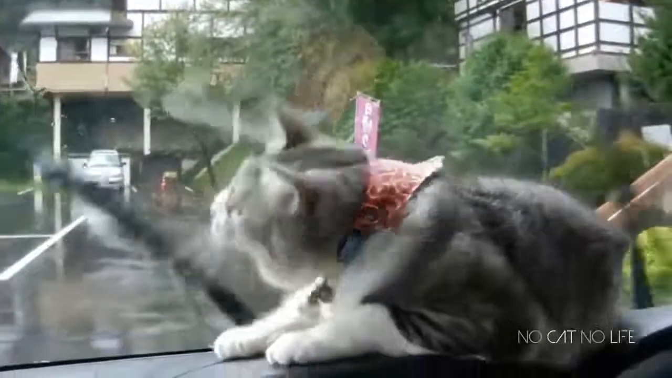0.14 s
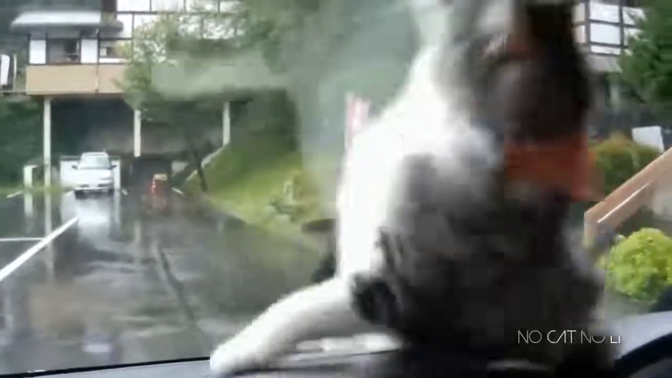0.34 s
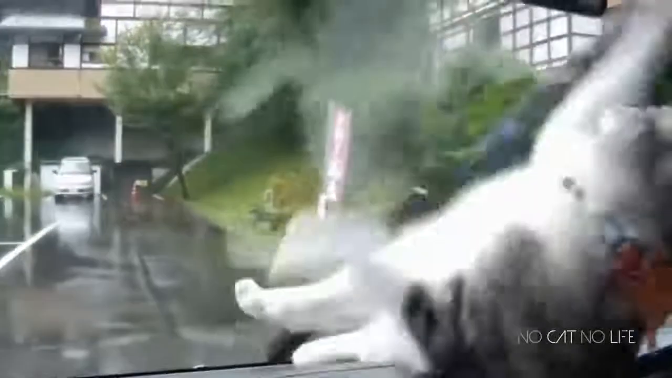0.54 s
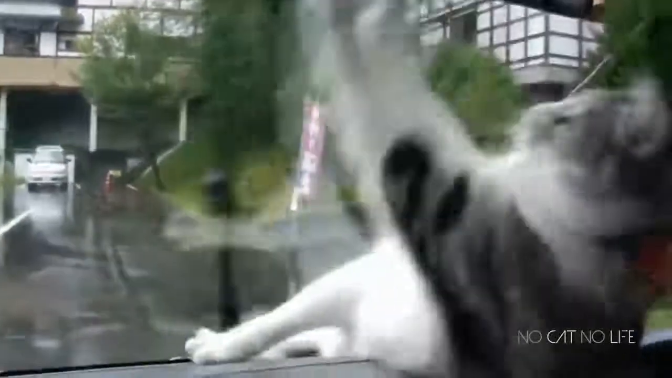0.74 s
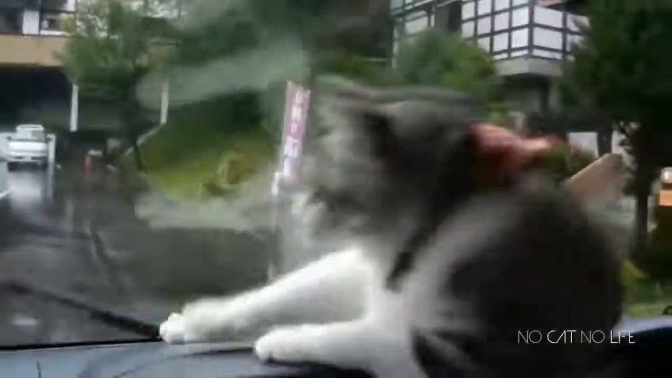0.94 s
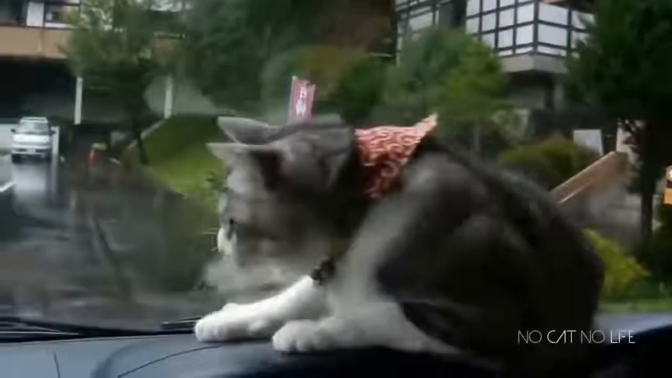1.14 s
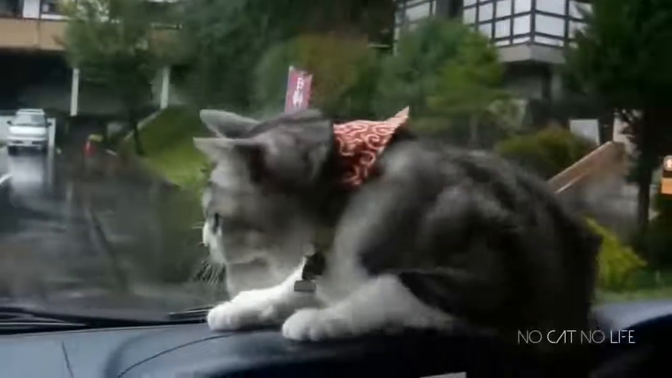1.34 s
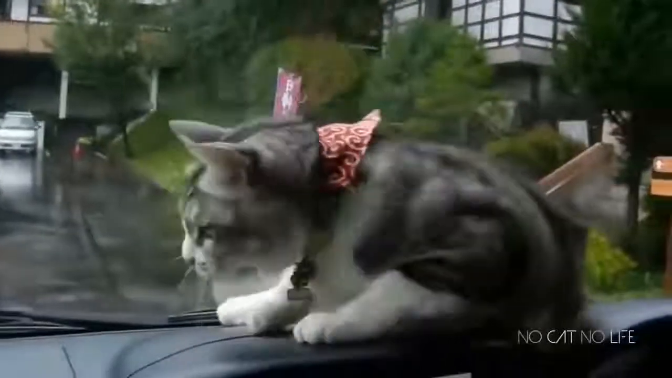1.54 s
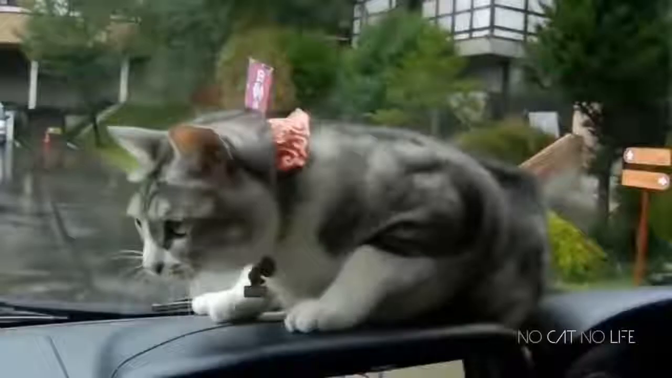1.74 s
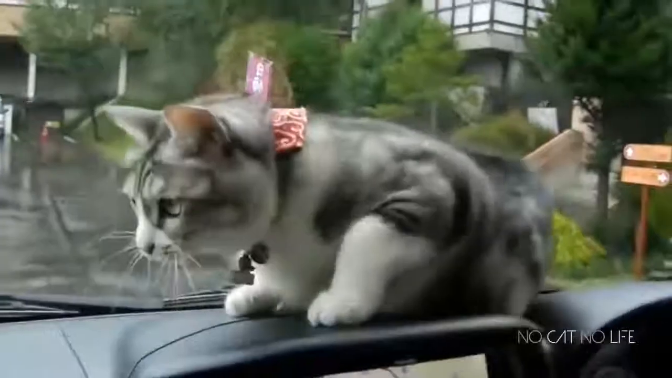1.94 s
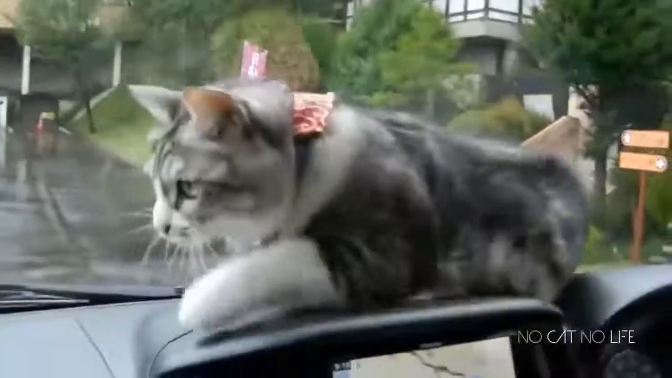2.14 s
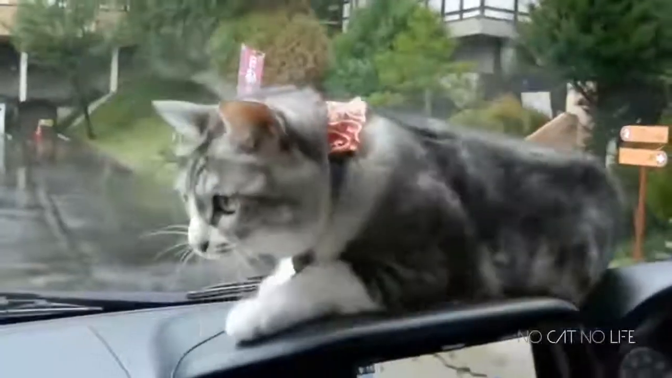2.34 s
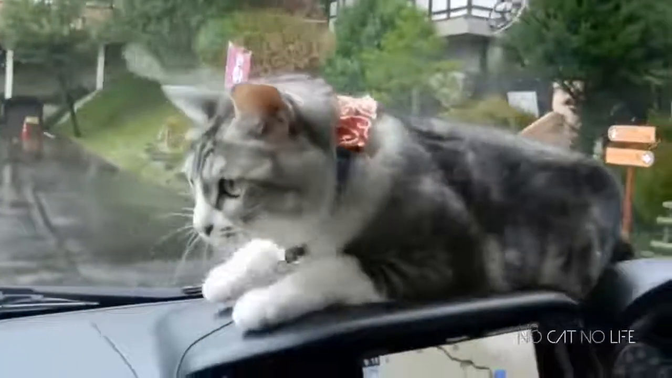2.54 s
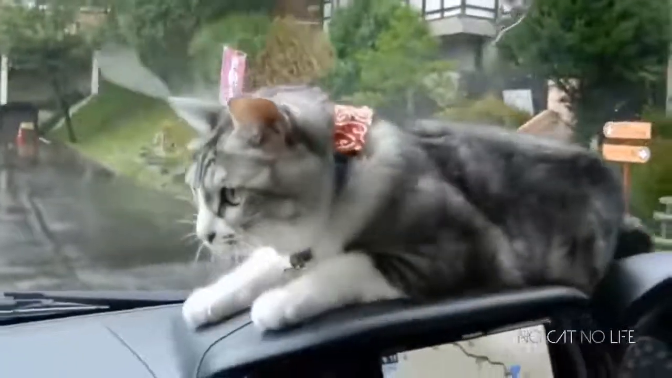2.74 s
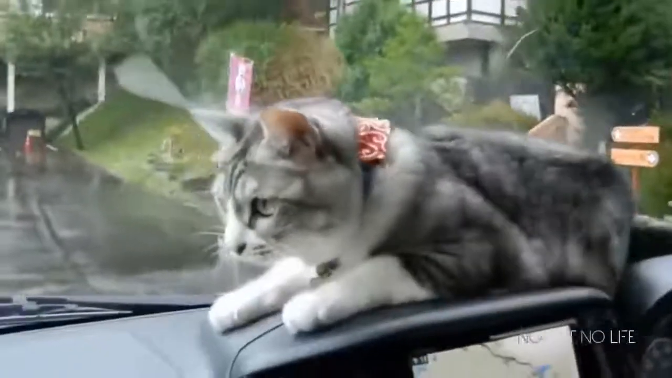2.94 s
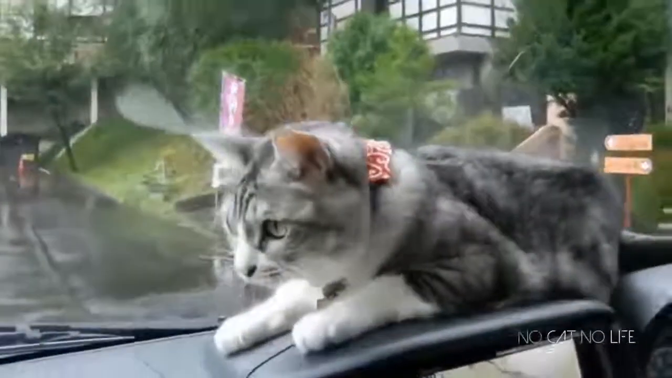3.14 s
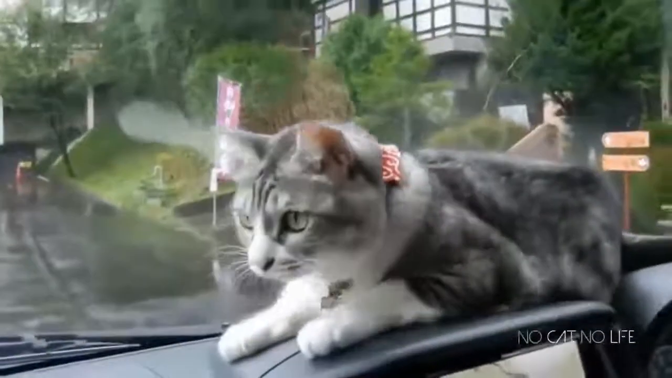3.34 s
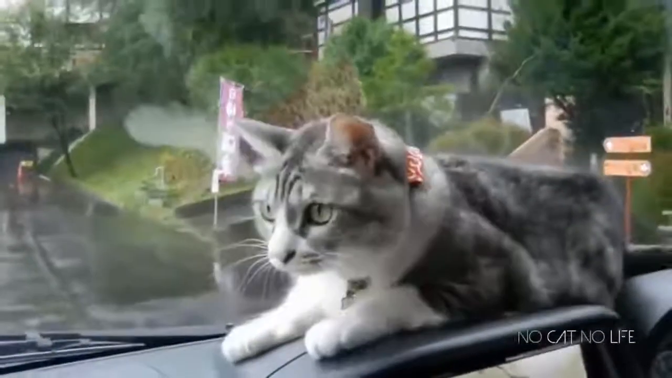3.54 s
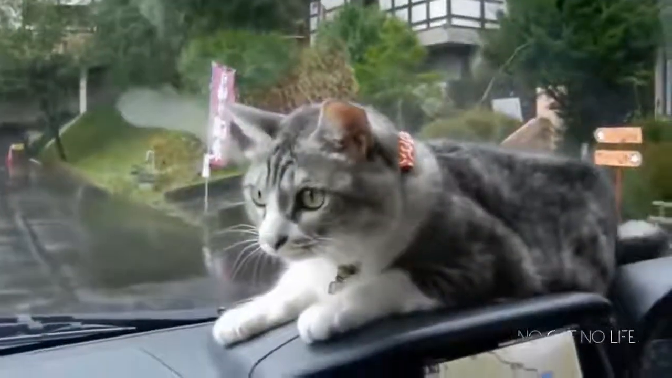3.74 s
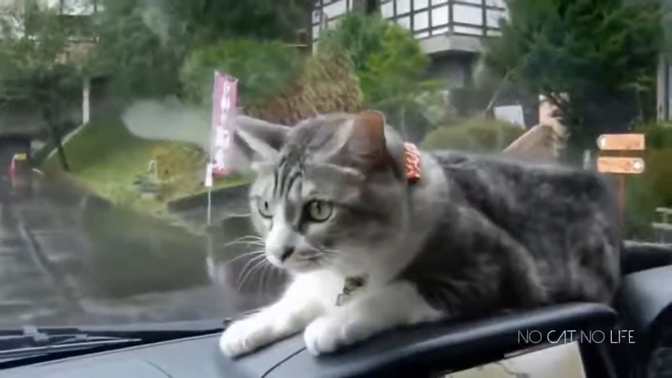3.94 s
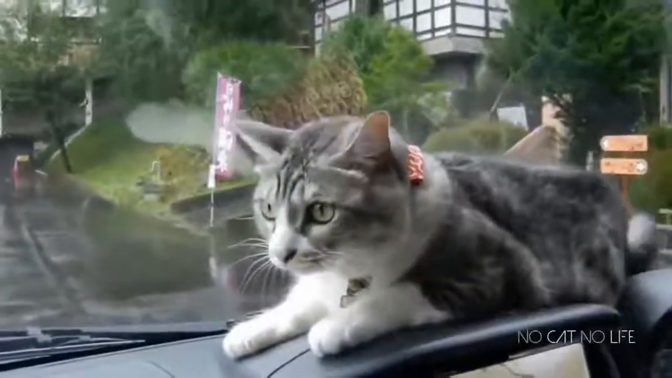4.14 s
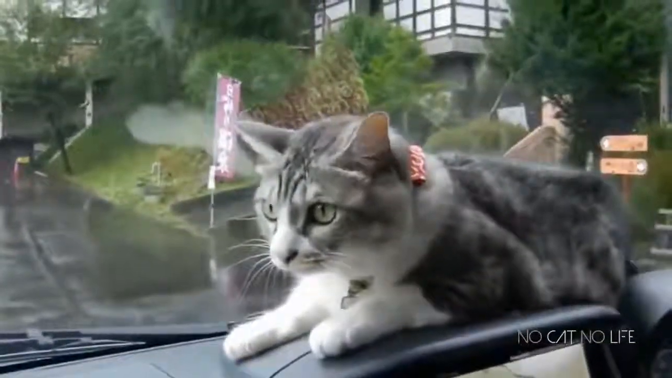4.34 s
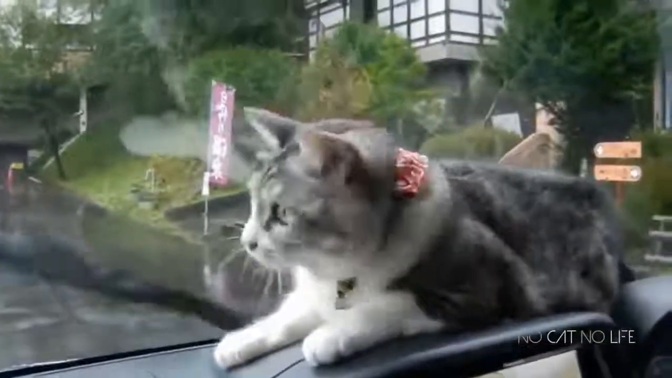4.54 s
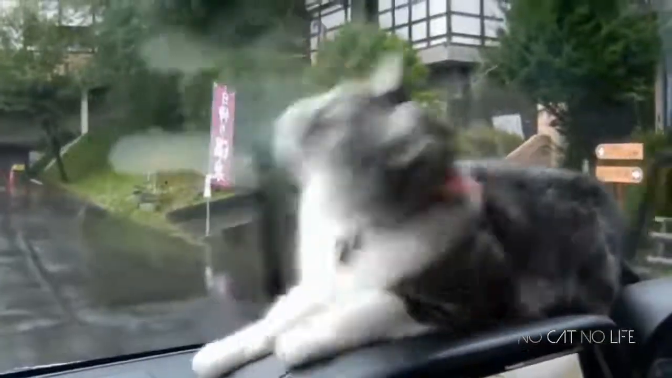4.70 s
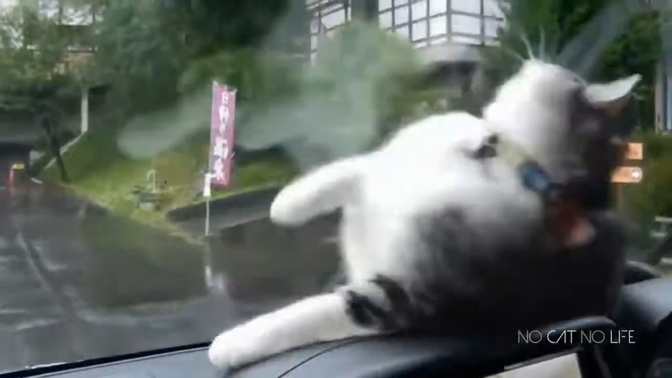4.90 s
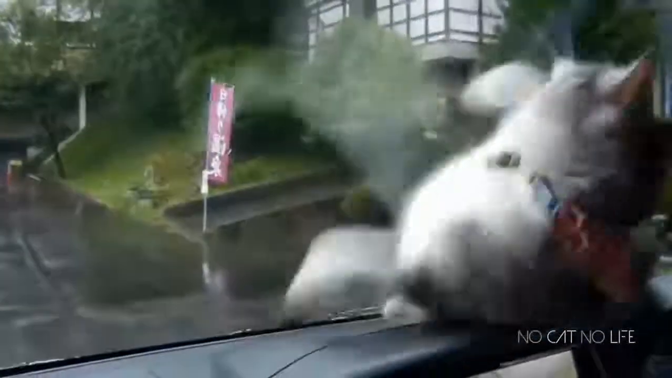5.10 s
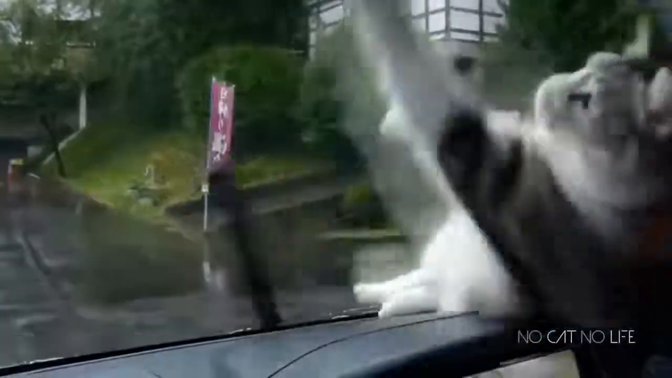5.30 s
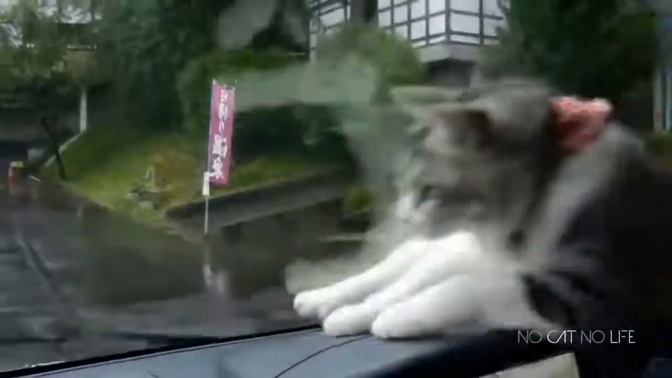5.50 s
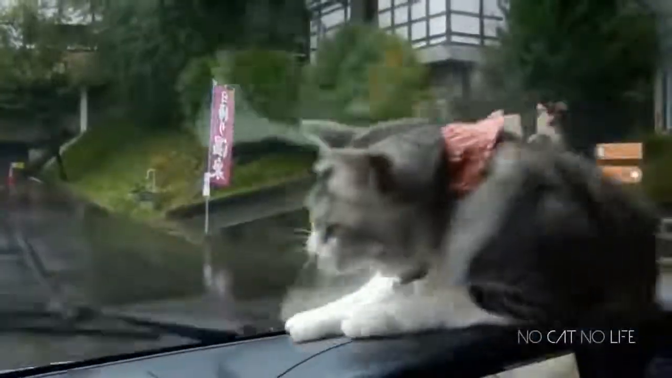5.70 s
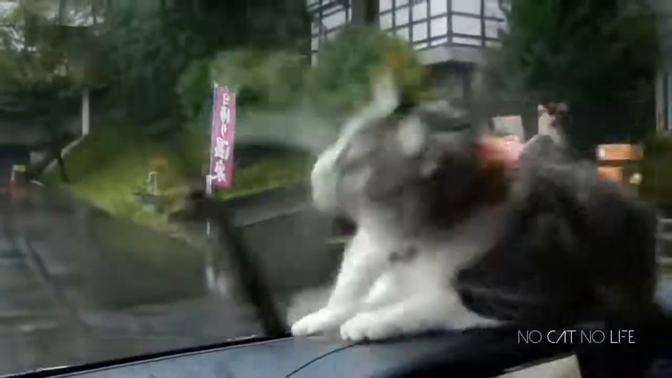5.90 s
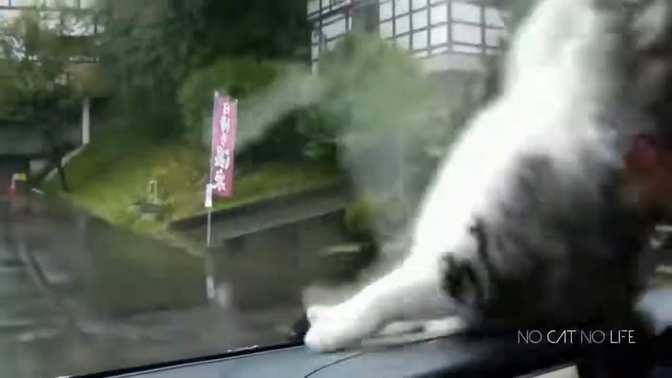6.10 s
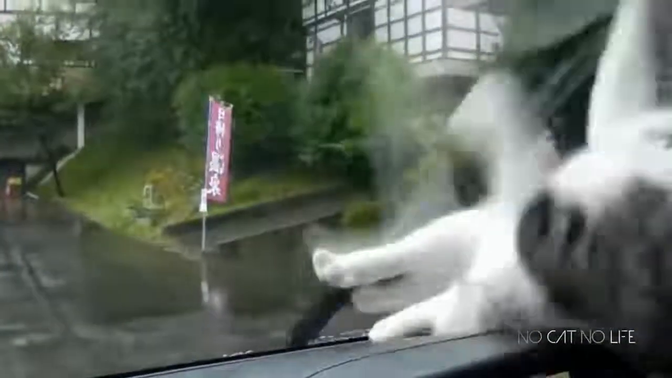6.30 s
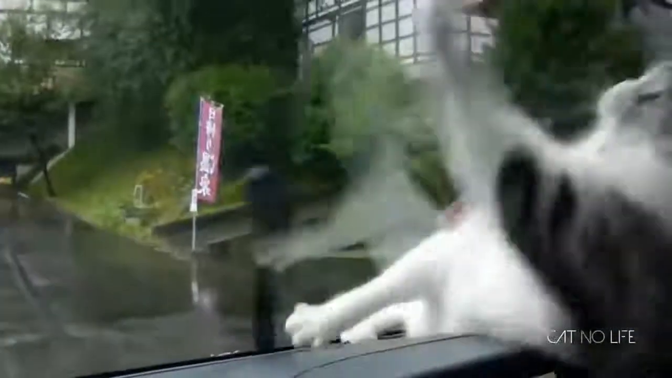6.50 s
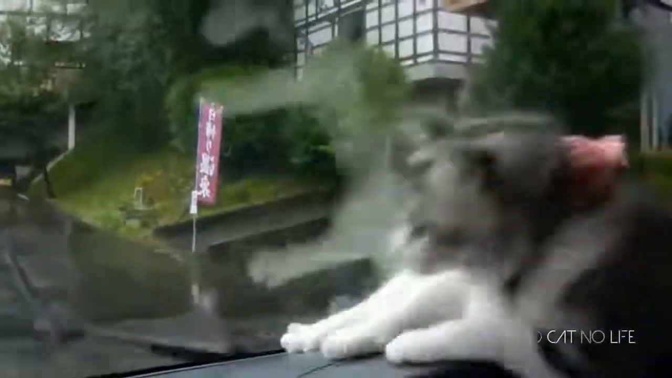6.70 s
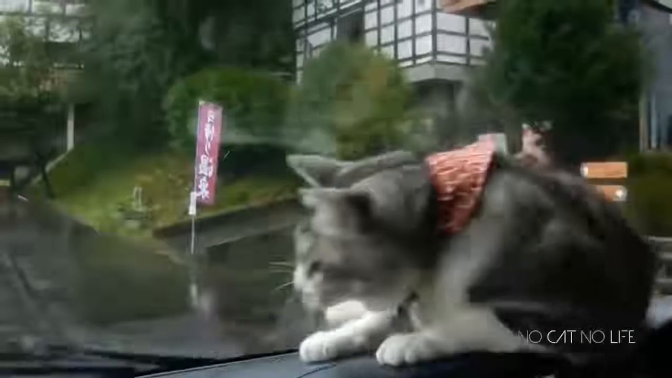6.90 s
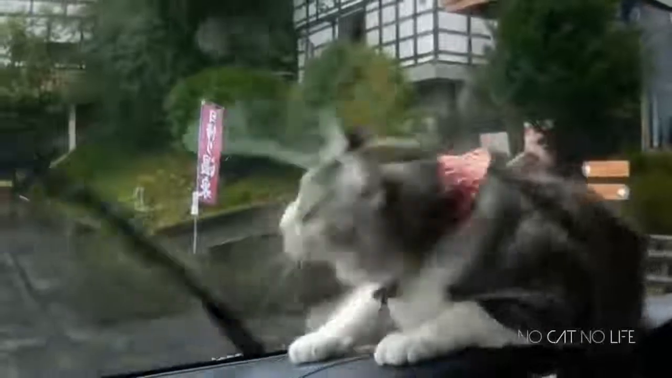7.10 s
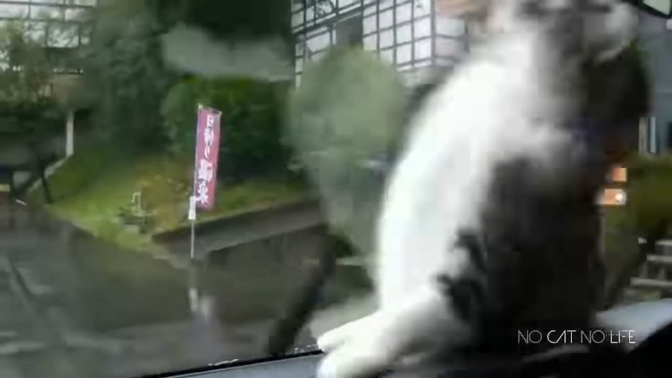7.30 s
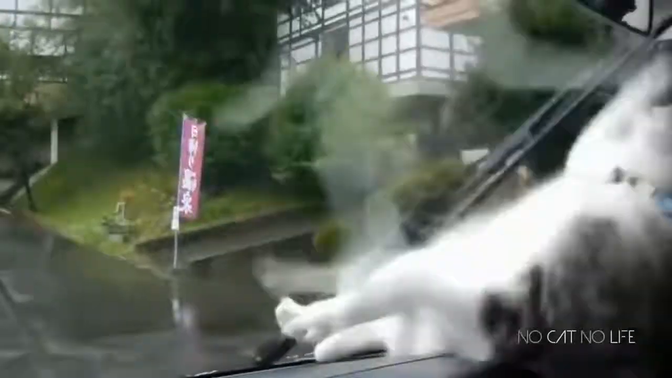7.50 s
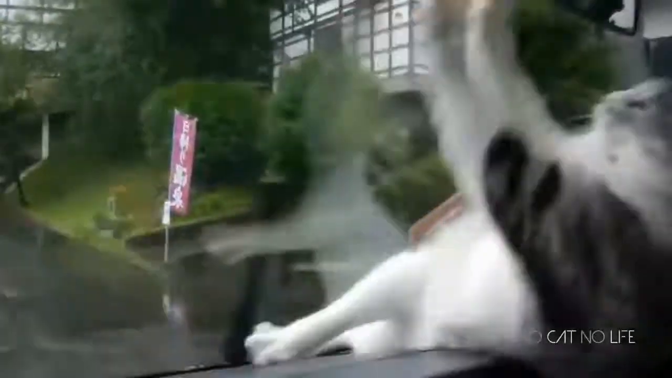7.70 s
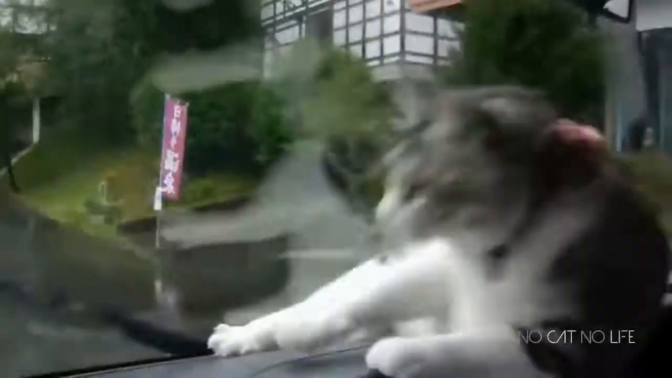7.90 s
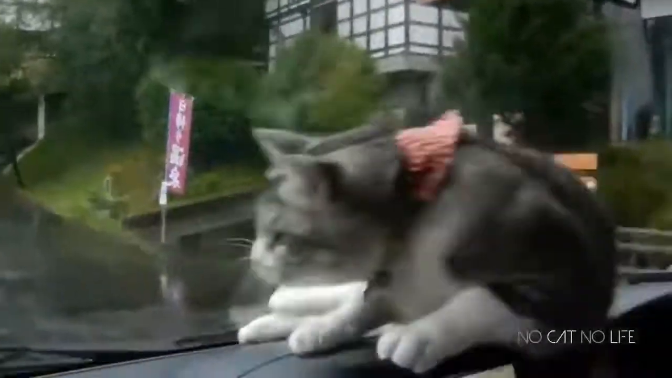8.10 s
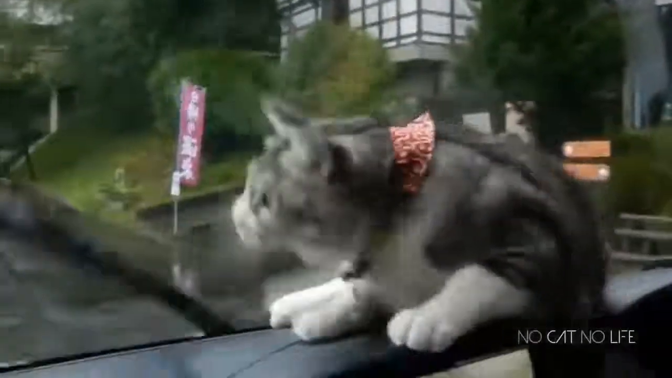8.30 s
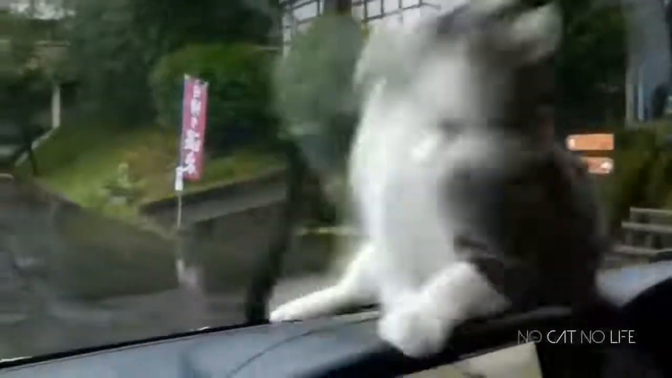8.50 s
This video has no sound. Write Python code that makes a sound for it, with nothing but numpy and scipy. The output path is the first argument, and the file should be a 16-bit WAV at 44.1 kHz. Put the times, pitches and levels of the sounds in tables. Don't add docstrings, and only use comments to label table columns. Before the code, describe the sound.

Inside a parked car, a low engine idle hums throughout beneath soft blower and fine rain hiss, picked up close by a small dashboard microphone that squeezes loud moments. At about 0.1-0.2 s the wipers shudder and flip, with a faint gear whine; from 0.5 to 1.2 s a cat swipes, claws clicking on glass, collar tag jingling brightly, and paws thumping. The blade parks with a jolt near 1.35 s. Until 4.5 s it is mostly idle and hiss, with a few dull paw steps, knocks and light taps around 1.5-2.8 s. At 4.6 s the wipers judder into motion again, followed by jingles, swishing fur and a sharp claw smack near 5.5 s. Hard stuttering turns come around 5.9, 7.2 and 8.4 s, with far-turn shudders between. Scrapes and claw clatter peak near 6.5 and 7.8 s, with a heavy knock at 8.1 s.

```python
import sys
import numpy as np
from scipy import signal
from scipy.fft import rfft, irfft, next_fast_len
from scipy.io import wavfile
from scipy.ndimage import uniform_filter1d, map_coordinates

SR = 44100
rng = np.random.default_rng(int(sys.argv[2]) if len(sys.argv) > 2 else 0)


def gain_from_decibels(decibels):
    exponent = np.asarray(decibels, float) / 20
    return 10 ** exponent


def store_wav(level_fs):
    pcm = np.round(np.clip(np.atleast_2d(level_fs), -1, 1) * 32767)
    wavfile.write(sys.argv[1], SR, pcm.T.astype(np.int16))


N = 377034

# (time [s], rate [cycles/s])
ENGINE_SPEED = [(0, 21.35), (6.5, 21.34), (6.75, 21.04), (8.55, 21.01)]
# (time [s], level [dB])
IDLE = [(0.0, -23), (.26, -28), (1.14, -25), (1.31, -26), (2.09, -25), (3.3, -24.5), (4.5, -24.5),
        (4.69, -26.5), (5.17, -24), (5.64, -25), (5.91, -34), (6.2, -27), (6.71, -22), (7.12, -31),
        (7.4, -30), (7.76, -24), (8.14, -29), (8.55, -27.5)]
ORDERS = [1, 2, 4, 5, 6, 8, 9, 10, 11, 16, 17, 20, 25, 30, 34]
ORDER_DB = [-38, -11, 1, -14.5, -11.5, -14.5, -16.5, -19, -30, -32, -25.5, -22.5, -30, -35, -32]
# (frequency [Hz], density [dB per Hz])
RUMBLE = [(6, -32), (28, 3), (42, -1), (80, 2), (108, 4), (150, -2), (230, -19.5), (400, -50.5)]
# (time [s], level [dB], treble over it [dB])
CABIN = [(0.0, -49.5, 5), (0.38, -45, -1), (0.78, -40, 0.5), (1.52, -45.5, -2), (2.14, -42, 1.5),
         (2.4, -45, 2), (3.2, -44, -2.5), (3.9, -44, -4), (4.62, -44.5, 0), (5.26, -41.5, 2.5),
         (5.81, -44, 4), (5.93, -46, 4.5), (6.17, -46.5, 2.5), (6.5, -44, 2), (6.93, -44.5, 6),
         (7.33, -47, 1), (7.79, -42, 7), (8.55, -46.5, 2)]
# (frequency [Hz], density [dB per Hz])
HISS = [(120, 1), (260, 2.5), (400, -0.5), (800, -7.5), (1300, -14), (2200, -17.5), (6000, -31),
        (9000, -34), (12500, -33)]

# (blade flip at the bottom [s], shudder before it [s], its level [dB],
# far-turn shudder [dB], gear strain [dB])
SWEEPS = [
    (0.187, 0.057, -22, -20.5, -49),
    (4.687, 0.038, -21.5, -21, -45),
    (5.931, 0.073, -16.5, -20.5, -51),
    (7.172, 0.053, -14.5, -22, -54),
    (8.422, 0.043, -18, -18, -54),
]
# (time after the flip [s], pitch [Hz])
GEAR = [
    (0, 1340),
    (.1, 1150),
    (.3, 1175),
    (.48, 1306),
    (.84, 1330),
    (.86, 1215),
    (1.01, 1308),
    (1.095, 1342),
    (1.14, 1318),
]
CHIRP_DB = [-38.5, -38, -39, -41, -50]
# (frequency [Hz], width [Hz], level [dB])
BODY = [(48.5, 21.3, -1.5), (114.7, 55, -3.5), (153.9, 30.5, 0.5), (198, 31.7, -5)]
# (frequency [Hz], width [Hz], level [dB])
PANEL = [(239, 134, 5), (356, 37, 9), (411.6, 33, 1), (675, 103, -3), (840, 190, -6.5)]
# (frequency [Hz], width [Hz], level [dB])
SWAY = [(89.5, 54, 0)]
# (time [s], peak [dB], pitch [Hz])
KICKS = [(0.121, -27, 138), (0.142, -12.5, 142), (0.153, -10, 104), (0.175, -14, 110), (4.582, -14.5, 124),
         (4.645, -23, 331), (4.652, -16, 141), (4.674, -13, 148), (4.692, -9, 115), (5.249, -13, 102),
         (5.266, -14, 118), (5.258, -19, 282), (5.274, -24, 304), (5.283, -14, 168), (5.31, -25, 339),
         (5.313, -6, 103), (5.337, -11, 101), (5.49, -9, 168), (5.511, -17, 156), (5.846, -7.5, 135),
         (5.865, -18, 145), (5.893, -12, 156), (5.904, -13, 134), (6.485, -16, 143), (6.569, -16, 103),
         (6.578, -14, 138), (6.648, -13.5, 152), (7.095, -10, 158), (7.107, -13, 204), (7.119, -19, 138),
         (7.134, -17, 102), (7.148, -11, 115), (7.161, -10, 125), (7.755, -13, 125), (8.0888, -6, 194),
         (8.094, -18, 201), (8.105, -18, 170), (8.16, -20, 153), (8.27, -17, 150), (8.341, -7, 126),
         (8.354, -12, 151), (8.376, -21, 117), (8.391, -6, 140), (8.405, -13, 135), (8.426, -4, 101)]
FLIPS = [.1911, 1.3532, 4.6845, 5.933, 7.1755, 8.4208]
# (frequency [Hz], density [dB per Hz])
SCRAPE = [(700, -59), (1200, 4.5), (2500, -2.5), (4000, -9.5), (6000, -19), (8000, -35)]
# (frequency [Hz], density [dB per Hz])
FIZZ = [(4000, -9), (5500, -0.5), (7500, -2.5), (10000, -5.5), (12500, -7)]

# (time [s], scrape level [dB], fizz level [dB])
SWIPES = [(0, -45.5, -72), (0.574, -40.5, -43.5), (.66, -44, -40), (.7, -65, -54), (0.809, -49, -37.5),
          (.93, -46, -42.5), (1.141, -50, -53), (1.55, -52.5, -64), (2.16, -64, -71), (2.23, -47.5, -68),
          (4.61, -42, -56), (4.84, -47, -65), (4.973, -37.5, -43.5), (5.12, -48, -44.5), (5.33, -48, -42),
          (5.51, -45, -41), (5.72, -47, -47), (5.9, -45, -44.5), (6.25, -51, -54), (6.36, -40, -39.5),
          (6.513, -34.5, -35), (6.648, -35, -43), (6.92, -52, -44), (7.04, -59, -48), (7.34, -47, -56.5),
          (7.6, -36.5, -39.5), (7.66, -42, -45), (7.8, -40, -41), (7.95, -42, -43), (8.04, -53, -53),
          (8.29, -50, -71), (8.46, -50, -47)]
# (time [s], level [dB])
THUMPS = [(.94, -29), (4.6, -35), (5.72, -31), (6.35, -26), (6.7, -22.5), (6.9, -22), (7.49, -46),
          (8.11, -22.5), (8.55, -33)]
# (frequency [Hz], level [dB], T60 [s])
TAG = [(5760, -4.5, 0.083), (6190, 4, 0.048), (6730, 6, 0.13)]
# (time [s], peak [dB])
RING_TAPS = [(0.658, -26), (.685, -31), (.717, -29), (0.78, -13.5), (1.0745, -36), (1.175, -35),
             (2.394, -36.5), (2.5681, -41), (4.7955, -33), (4.822, -30), (5.046, -28), (5.1613, -17),
             (5.327, -23), (5.665, -33), (5.7194, -26), (5.8765, -29.5), (5.982, -29.5), (6.405, -36),
             (6.44, -40), (6.5994, -32), (6.7394, -36), (6.905, -27), (7.0668, -41), (8.275, -27.5),
             (8.4472, -33)]
# (time [s], peak [dB])
RIM_TAPS = [(.5212, -46), (.5756, -35), (0.611, -30), (0.808, -18.5), (0.893, -37), (.97, -39),
            (1.053, -38), (1.134, -41), (1.2436, -42), (1.528, -41), (4.849, -27.5), (5.086, -35),
            (5.1064, -23), (5.118, -24), (5.152, -36), (5.234, -26.5), (5.283, -29), (5.362, -20),
            (5.696, -32), (5.7482, -32.5), (6.265, -31.5), (6.323, -28), (6.3382, -26), (6.352, -23.5),
            (6.465, -33), (6.5507, -28), (6.879, -32), (7.001, -37), (7.4744, -38), (7.596, -22.5),
            (8.076, -36), (8.1344, -38)]
# (time [s], peak [dB], pitch [Hz], knock [dB])
PAWS = [(0.927, -13, 121.5, -32), (1.278, -17, 103, -15), (1.343, -20, 239, -17), (1.553, -37, 102, -5),
        (1.859, -33, 102, -3.5), (2.803, -12, 114, -31), (5.25, -37, 101, -30), (5.779, -16, 109, -19),
        (5.834, -24, 166, -34), (6.548, -22, 122, -6), (7.474, -20, 193, -16.5)]
# (time [s], peak [dB], snap [dB], thud [dB])
KNOCKS = [(0.189, -51, -20, -7), (0.599, -38, -15, 5), (0.752, -36.5, -17, 11), (1.122, -33.5, -19, 9.5),
          (1.344, -39.5, -12, 17.5), (1.554, -43, -15, 7), (1.861, -48, -17, 0), (2.321, -34.5, -25, 11.5),
          (4.5, -32, -35, 3), (4.681, -54, -14, 3), (5.311, -29.5, -43, 0), (5.683, -26, -23, 0.5),
          (6.876, -23, -21, 3.5), (7.023, -32.5, -23, 5), (7.152, -37.5, -12.5, -4), (8.088, -20, -18, 4.5),
          (8.096, -29, -28, 10), (8.337, -31.5, -30, 11.5)]
# (frequency [Hz], width [Hz], level [dB])
DASH = [(196, 17, 4.5), (420, 160, -7.5)]
# (frequency [Hz], width [Hz], level [dB])
TRIM = [(533, 500, 5), (690, 244, 10.5), (770, 44, 10.5), (984, 58, 5.5), (1220, 1050, -6.5)]
# (frequency [Hz], density [dB per Hz])
SNAP = [(1000, -49), (1600, 2), (2200, 4), (3500, -20), (7000, -44), (12000, -46)]
# (time [s], peak [dB], thud [dB], knock [dB], top [dB])
HITS = [(0.6465, -29, -8, 2, -18), (0.7152, -45, 0, -6, 22.5), (0.7829, -13, 17, 2, -23),
        (0.806, -35, 31, 11, -9), (0.9159, -16.5, 19.5, -16, -25.5), (2.096, -44, -5, -7.5, 12),
        (2.199, -44.5, 1, 23, -25), (4.597, -30.5, -28, 1, -26), (4.609, -36, -28, -2, -26),
        (5.0642, -31, 27, -5, -19), (5.481, -24, 0, -13, 3), (5.4922, -10.5, -23, -0.5, 2),
        (6.2325, -43, 12, 5, 20.5), (6.366, -21.5, 24, 8.5, -26), (6.506, -12, -12, -3, -20),
        (6.6311, -18.5, 15, -2, -41), (6.711, -27, -2, -13, -21.5), (6.8, -27.5, 3, -19, 1),
        (7.595, -42, -17, 9, -19), (7.6407, -28, -11, 7, -23), (7.7753, -10, 11, 0, -33),
        (7.895, -12, 6.5, -7, -9), (7.9532, -25, -15, 5, -23), (7.9823, -25.5, -3, -24, -10),
        (8.2772, -51, 31, 20, -5)]
# (frequency [Hz], width [Hz], level [dB])
GLASS = [(2040, 750, -5), (2700, 870, -4), (3200, 620, 4), (3700, 2700, -8), (5130, 780, -4)]
# (frequency [Hz], density [dB per Hz])
SLAP = [(400, -30), (700, -3), (2000, 9), (4500, 1.5), (6500, -5), (9000, -30)]
# (time [s], peak [dB], pitch [Hz])
CLAWS = [(0.6479, -29, 2560), (0.6516, -31, 1700), (0.7815, -20, 5660), (0.784, -18, 3750),
         (0.7862, -15, 2610), (0.7884, -18, 2890), (0.7911, -20, 2070), (0.7933, -23, 2670),
         (0.8105, -21, 6030), (0.9165, -29, 1810), (0.918, -26, 1890), (0.9194, -25, 2950),
         (0.922, -26, 2910), (0.9241, -28, 2800), (0.9275, -29, 2840), (5.4941, -11, 2610),
         (5.4966, -15, 2670), (5.6847, -28, 1720), (5.6871, -30, 2020), (6.3631, -28, 1890),
         (6.3672, -28, 3830), (6.3702, -26, 1870), (6.3719, -29, 2280), (6.3779, -30, 1940),
         (6.5059, -18, 5860), (6.5074, -15, 2560), (6.5088, -13, 2860), (6.6331, -24, 2260),
         (6.6348, -26, 1920), (6.6373, -22, 3120), (6.642, -19, 2350), (6.645, -22, 2610),
         (6.6487, -24, 2000), (6.6507, -24, 2410), (6.8752, -29, 1980), (7.7756, -14, 5360),
         (7.7771, -10, 2860), (7.7807, -13, 2630), (7.7834, -17, 2260), (7.8978, -20, 2390),
         (7.9003, -17, 2500), (7.902, -19, 2950), (7.9568, -31, 5190), (7.9614, -30, 2430),
         (8.0886, -25, 1830), (8.0914, -24, 1890), (8.094, -29, 1960), (8.0957, -28, 1850),
         (8.0981, -30, 2280)]

TURN_S = 0.625
WIPE_S, WIPE_HOLD_S = 0.28, 0.865


def unit(x):
    return x / np.sqrt(np.mean(x ** 2) + 1e-20)


def decay(t, t60):
    return gain_from_decibels(-60 * t / t60)


def onset(t, rise_s):
    return 1 - np.exp(-t / rise_s)


def curves(table):
    s, *columns = np.transpose(table)
    return [np.interp(np.arange(N) / SR, s, column) for column in columns]


def wobble(rate):
    at = np.arange(0, N + 16, 16)
    knots = rng.standard_normal(int(N * rate / SR) + 4)
    return np.interp(np.arange(N), at, map_coordinates(knots, [at * rate / SR]))


def filtered(x, response):
    m = next_fast_len(len(x) + 8192)
    spectrum = rfft(x, m) * response(np.fft.rfftfreq(m, 1 / SR))
    return unit(irfft(spectrum, m)[:len(x)])


def colour(points):
    hz, db = np.transpose(points)
    return lambda f: gain_from_decibels(np.interp(np.log(f + 1), np.log(hz + 1), db))


def modes(table):
    def response(f):
        return sum((-1) ** k * gain_from_decibels(db) * 1j * f * width / (hz * hz - f * f + 1j * f * width)
                   for k, (hz, width, db) in enumerate(table))
    return response


def dull(table, edge_hz):
    return lambda f: modes(table)(f) / (1 + 1j * f / edge_hz) ** 2


def grainy(depth_db, rate):
    return rng.standard_normal(N) * gain_from_decibels(depth_db * wobble(rate))


def patchy(noise, depth_db):
    z = signal.stft(noise, nperseg=512)[2]
    field = uniform_filter1d(rng.standard_normal(z.shape), size=8, axis=0)
    field = uniform_filter1d(field, size=8, axis=1)
    return signal.istft(z * gain_from_decibels(depth_db * unit(field)), nperseg=512)[1][:N]


def evened(x, window_s):
    power = np.abs(uniform_filter1d(x ** 2, size=round(window_s * SR)))
    return unit(x / (power + .05) ** .35)


def swells(rows, rise, fall):
    t = np.arange(0, N, 32) / SR
    s, hold, db = np.transpose(rows)[..., None]
    below_db = np.maximum(rise * (s - t), fall * (t - s - hold))
    gain = gain_from_decibels(db - np.maximum(below_db, 0))
    return np.interp(np.arange(N) / SR, t, np.sqrt(np.sum(gain ** 2, axis=0)))


def each_sweep(after_s, hold_s, db):
    levels = db + np.zeros(len(SWEEPS))
    return [(row[0] + after_s, hold_s, level) for row, level in zip(SWEEPS, levels)]


def add(track, s, sound):
    i = round(s * SR)
    track[i:i + len(sound)] += sound


def engine():
    turn = 2 * np.pi * np.cumsum(curves(ENGINE_SPEED)[0]) / SR
    turn = turn + 0.05 * wobble(1.5)
    lines = np.zeros(N)
    for k, db in zip(ORDERS, ORDER_DB):
        tremble_db = min(.13 * k, 1.8) * (wobble(7) + .6 * wobble(20))
        phase = k * (turn + 0.0095 * wobble(9)) + rng.uniform(0, 2 * np.pi)
        lines += gain_from_decibels(db + tremble_db) * np.sin(phase)
    return gain_from_decibels(curves(IDLE)[0] + 0.88) * lines


def cabin():
    level_db, treble_db = curves(CABIN)
    hiss = filtered(patchy(rng.standard_normal(N), depth_db=1.18), colour(HISS))
    treble = signal.sosfilt(signal.butter(1, 3500, "high", fs=SR, output="sos"), hiss)
    rumble = evened(filtered(grainy(0.42, 8.2), colour(RUMBLE)), window_s=0.056)
    rumble = gain_from_decibels(curves(IDLE)[0] - 7.5) * rumble
    return rumble + gain_from_decibels(level_db + 4.5) * (hiss + (gain_from_decibels(treble_db) - 1) * treble)


def gear():
    flip, _, _, _, strain_db = np.transpose(SWEEPS)
    t = np.arange(N) / SR
    since = t - flip[np.maximum(np.searchsorted(flip, t) - 1, 0)]
    hz = np.interp(since, *np.transpose(GEAR))
    chirps = each_sweep(1.095, .013, np.array(CHIRP_DB))
    chirps += [(s, 0, -35) for s in flip[2:]]
    steady = each_sweep(WIPE_S, WIPE_HOLD_S, -55.5)
    steady += each_sweep(0.49, 0.115, strain_db)
    steady += each_sweep(0.93, 0.14, -52)
    gain = swells(chirps, 2700, 2700) + swells(steady, 300, 250)
    rough = gain_from_decibels(0.5 + 1.2 * (wobble(35) + wobble(110)))
    return gain * rough * np.sin(2 * np.pi * np.cumsum(hz) / SR + .25 * wobble(36))


def sway():
    _, _, jolt_db, turn_db, _ = np.transpose(SWEEPS)
    settle_s, settle_db = 0.029, -5.5
    rows = each_sweep(0, settle_s, jolt_db + settle_db)
    rows += each_sweep(TURN_S + 0.046, settle_s, turn_db + settle_db)
    rocking = filtered(rng.standard_normal(N), lambda f: dull(SWAY, edge_hz=250)(f) ** 2)
    return swells(rows, 310, 400) * evened(rocking, window_s=0.023)


def shudder():
    _, _, jolt_db, turn_db, _ = np.transpose(SWEEPS)
    rows = [(s - hold, hold, db) for s, hold, db, _, _ in SWEEPS]
    rows.append((1.365, 0, -20))
    jolts = swells(rows, 520, 540) + swells(each_sweep(TURN_S, 0.02, turn_db), 81, 240)
    sweep_s = 1.32
    drag = swells(each_sweep(-0.21, sweep_s + 0.15, -28.5), 54, 47)
    thumps = swells([(s, 0, db) for s, db in THUMPS], 84, 110)
    bite = swells(each_sweep(-0.022, 0.03, jolt_db - 2), 470, 2500)
    panel_gain = gain_from_decibels(-9) * (jolts + bite) + gain_from_decibels(-10.5) * drag + gain_from_decibels(-14.5) * thumps
    slips = grainy(2.5, 60)
    body = evened(filtered(slips, dull(BODY, edge_hz=500)), window_s=0.0323)
    panels = filtered(slips, dull(PANEL, edge_hz=1600))
    return gain_from_decibels(-4.5) * ((jolts + drag + thumps) * body + panel_gain * panels)


def lumps():
    out, t = np.zeros(N + SR), np.arange(SR // 10) / SR
    for s, db, pitch_hz in KICKS:
        rasp = filtered(rng.standard_normal(len(t)), dull(PANEL, edge_hz=900))
        kick = gain_from_decibels(-14) * rasp - np.sin(2 * np.pi * pitch_hz * t)
        add(out, s, gain_from_decibels(db - 1) * decay(t, 0.088) * onset(t, 0.0015) * kick)
    return out[:N]


def flips():
    out, t = np.zeros(N + SR), np.arange(SR // 20) / SR
    rise_s, back_s = .00006, .002
    step = 1 - (1 + t / rise_s) * np.exp(-t / rise_s)
    for s in FLIPS:
        add(out, s, gain_from_decibels(-14.5) * step * np.exp(-t / back_s))
    return out[:N]


def rub_gains():
    scrape = [(s, 0, db) for s, db, _ in SWIPES] + each_sweep(WIPE_S, WIPE_HOLD_S, -59)
    fizz = [(s, 0, db) for s, _, db in SWIPES] + each_sweep(WIPE_S, WIPE_HOLD_S, -56)
    return swells(scrape, 306, 490), swells(fizz, 195, 330)


def rub():
    scrape_gain, fizz_gain = rub_gains()
    scrape = filtered(grainy(2.5, 70), colour(SCRAPE))
    fizz = filtered(patchy(grainy(3, 260), depth_db=2.5), colour(FIZZ))
    return scrape_gain * scrape + fizz_gain * fizz


def chatter():
    shape = (len(TAG), N)
    touches = rng.standard_normal(shape) * (rng.random(shape) < 70 / SR)
    shiver = np.zeros(N)
    for k, (row, (hz, _, t60)) in enumerate(zip(touches, TAG)):
        shiver += gain_from_decibels(-4 * k) * filtered(row, modes([(hz, 2.2 / t60, 0)]))
    return gain_from_decibels(-9) * rub_gains()[1] * shiver


def collar():
    out, t = np.zeros(N + SR), np.arange(SR // 8) / SR
    rattle_modes = modes([(6150, 750, 6.0), (7750, 880, 1.5), (10100, 1700, -4.5)])
    taps = [(*tap, 5700) for tap in RING_TAPS] + [(*tap, 6190) for tap in RIM_TAPS]
    for s, db, struck_hz in taps:
        ring = np.zeros(len(t))
        for hz, level, t60 in TAG:
            luck_db, detune = rng.standard_normal(2) * [2, .004]
            level_db = level + luck_db - 0.028 * abs(hz - struck_hz)
            ring += gain_from_decibels(level_db) * decay(t, t60) * np.sin(2 * np.pi * hz * (1 + detune) * t)
        rattle = gain_from_decibels(-9) * decay(t, 0.13) * filtered(rng.standard_normal(len(t)), rattle_modes)
        add(out, s, gain_from_decibels(db - 7.0) * (ring + rattle) * onset(t, 0.00062))
    return out[:N]


def paws():
    out, t = np.zeros(N + SR), np.arange(SR // 6) / SR
    for s, db, pitch_hz, knock_db in PAWS:
        push = np.sin(2 * np.pi * pitch_hz * t) * decay(t, 0.2) * onset(t, 0.0012)
        tap = filtered(rng.standard_normal(len(t)), modes(PANEL[2:]))
        add(out, s, gain_from_decibels(db) * (push + gain_from_decibels(knock_db + 1.0) * decay(t, 0.11) * tap))
    return out[:N]


def knocks():
    out, t = np.zeros(N + SR), np.arange(SR // 6) / SR
    for s, db, snap_db, thud_db in KNOCKS:
        a, b, c = rng.standard_normal((3, len(t)))
        snap = filtered(a, colour(SNAP)) * (decay(t, 0.099) + 2.0 * decay(t, 0.1)) * onset(t, 0.00012)
        crack = filtered(a, lambda f: 1j * f / (1 + 1j * f / 3000) ** 3)
        snap += gain_from_decibels(-1) * decay(t, .014) * crack
        b[0] = gain_from_decibels(16)
        trim = filtered(b * decay(t, 0.074), dull(TRIM, edge_hz=2200))
        thud = gain_from_decibels(thud_db) * filtered(c * decay(t, 0.031), dull(DASH, edge_hz=530))
        add(out, s, gain_from_decibels(db - 3.0) * (gain_from_decibels(snap_db) * snap + gain_from_decibels(-11) * (trim + thud)))
    return out[:N]


def hits():
    out, t = np.zeros(N + SR), np.arange(SR // 5) / SR
    middle = [(300, -53), (500, 10), (900, 4.0), (1500, -19.0), (2200, -24.0)]
    soft_to_hard_db = [-13, -2.5]
    lead_s, lead_grows_s = .03, .012
    lead = np.exp(np.minimum(t - lead_s, 0) / lead_grows_s) * (t < lead_s)
    for s, db, thud_db, knock_db, top_db in HITS:
        t60 = np.interp(db, soft_to_hard_db, [0.09, 0.023])
        rise_s = np.interp(db, soft_to_hard_db, [0.0023, 0.00076])
        a, b, c, d, e = rng.standard_normal((5, len(t)))
        stutter = gain_from_decibels(2.2 * unit(uniform_filter1d(e, size=70)))
        a, c = a * stutter, c * stutter
        pane = [(hz, width, level + 2 * rng.standard_normal()) for hz, width, level in GLASS]
        burst = filtered(a, modes(pane))
        burst += gain_from_decibels(-1) * filtered(a[::-1], colour(SLAP))
        burst += gain_from_decibels(knock_db) * filtered(b, colour(middle))
        burst += gain_from_decibels(top_db) * filtered(c, colour(FIZZ))
        fall = (decay(t, t60) + 0.36 * decay(t, 0.23)) * onset(t, rise_s)
        thud = filtered(d, modes(BODY[1:] + PANEL[:3]))
        thud = gain_from_decibels(thud_db - 7.5) * decay(t, 0.078) * onset(t, 0.01) * thud
        add(out, s, gain_from_decibels(db - 11.5) * (gain_from_decibels(-4) * fall * burst + thud))
        add(out, s - lead_s, gain_from_decibels(db - 25.5) * lead * burst[::-1])
    return out[:N]


def claws():
    out, t = np.zeros(N + SR), np.arange(SR // 50) / SR
    for s, db, pitch_hz in CLAWS:
        edge = gain_from_decibels(-7) * decay(t, .004) * filtered(rng.standard_normal(len(t)), colour(SLAP))
        ring = decay(t, .013) * np.sin(2 * np.pi * pitch_hz * t) * onset(t, .0003)
        add(out, s, gain_from_decibels(db + 2.5) * (ring + edge))
    return out[:N]


def scene():
    background = engine() + cabin()
    wipers = gear() + sway() + shudder() + lumps() + flips() + rub()
    cat = chatter() + collar() + paws() + knocks() + hits() + claws()
    return (background + wipers + cat)[None]


def gain_control(x, start_db, slope, hold_s):
    keep = np.exp(-1 / (hold_s * SR))
    power = signal.lfilter([1 - keep], [1, -keep], x ** 2)
    over_db = np.maximum(10 * np.log10(power + 1e-12) - start_db, 0)
    return x * gain_from_decibels(-slope * over_db)


def dropouts(x, share, from_hz):
    hz, _, z = signal.stft(x, SR, nperseg=1024)
    power = np.abs(z) ** 2 + 1e-14
    band = uniform_filter1d(power, size=9, axis=-2)
    over_db = 10 * np.log10(band / np.median(band, axis=-1, keepdims=True))
    bass_db = 10 * np.log10(uniform_filter1d(power.sum(-2, keepdims=True), size=5, axis=-1))
    luck = uniform_filter1d(rng.standard_normal(z.shape), size=6, axis=-2)
    luck = unit(uniform_filter1d(luck, size=5, axis=-1))
    octaves = np.log2(hz / from_hz + 1)[:, None]
    need = .6 * over_db - .6 * bass_db + 3 * luck - 2.5 * octaves
    high = hz > from_hz
    silent = (need < np.quantile(need[:, high], share)) & high[:, None]
    return signal.istft(z * ~silent, SR, nperseg=1024)[1][..., :N]


def roll_off(x):
    return signal.sosfilt(signal.butter(12, 12510, fs=SR, output="sos"), x)


def record(dry):
    x = gain_control(dry, start_db=-26.5, slope=0.26, hold_s=0.13)
    x = x / (1 + np.abs(x / .62) ** 4) ** .25
    x = dropouts(x, share=.08, from_hz=3000)
    band_limit = signal.ellip(12, .5, 80, 12060, fs=SR, output="sos")
    return roll_off(signal.sosfilt(band_limit, x))


dry = scene()
out = record(dry)
store_wav(out)
```